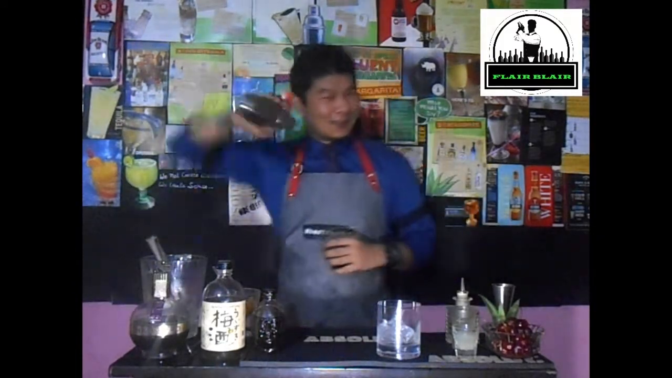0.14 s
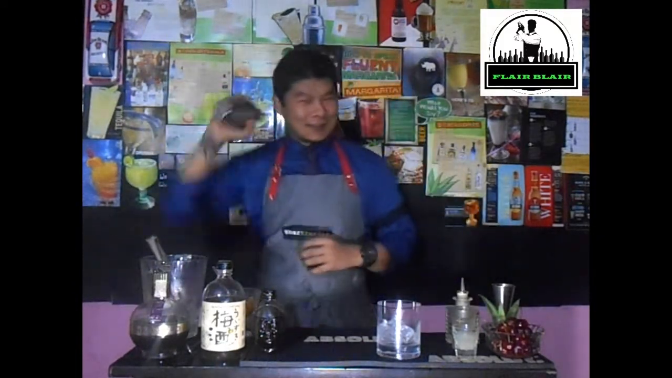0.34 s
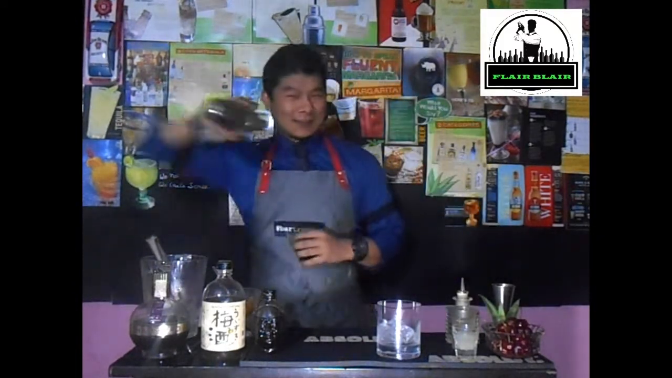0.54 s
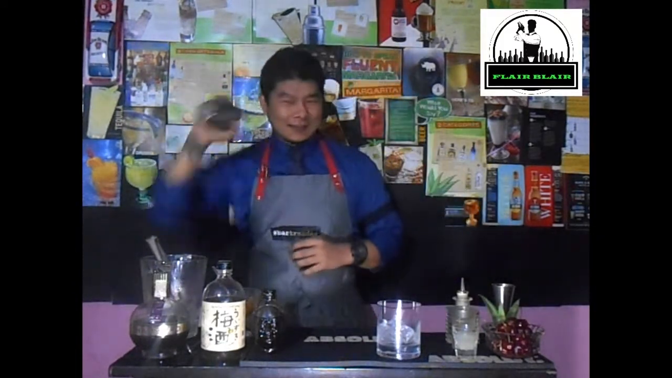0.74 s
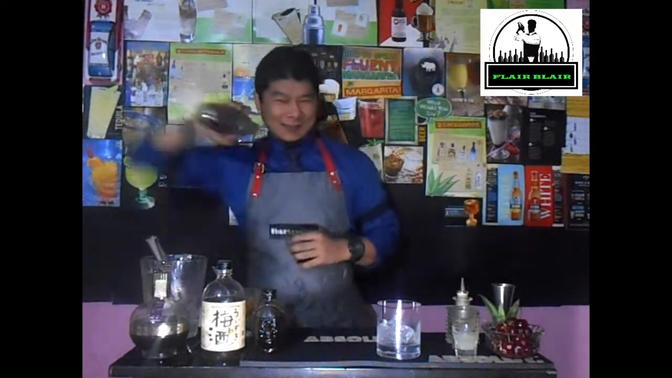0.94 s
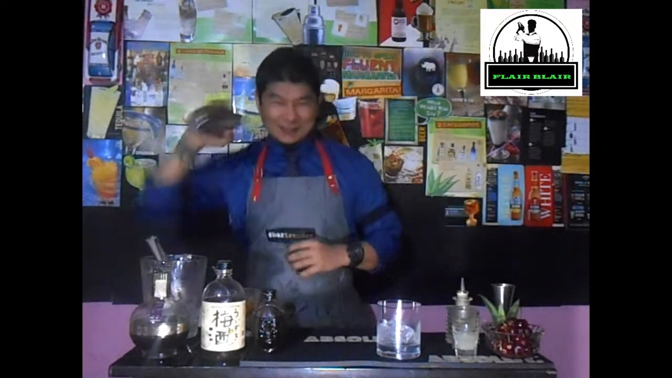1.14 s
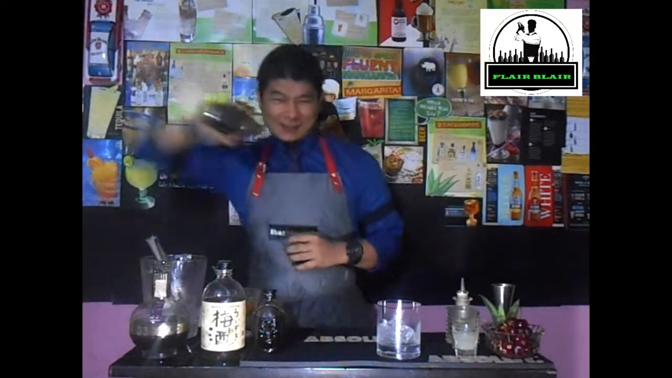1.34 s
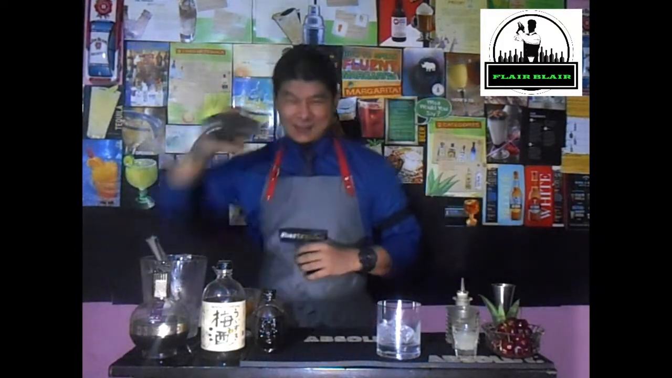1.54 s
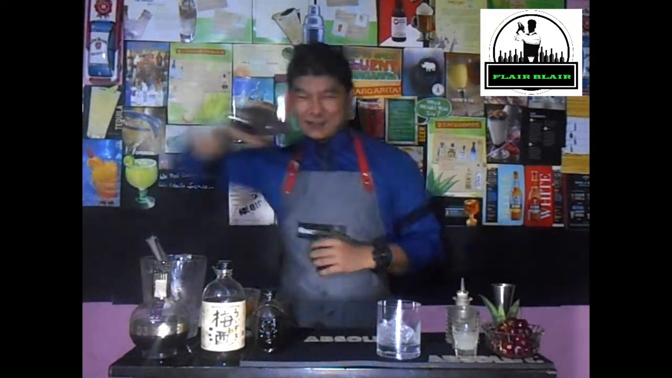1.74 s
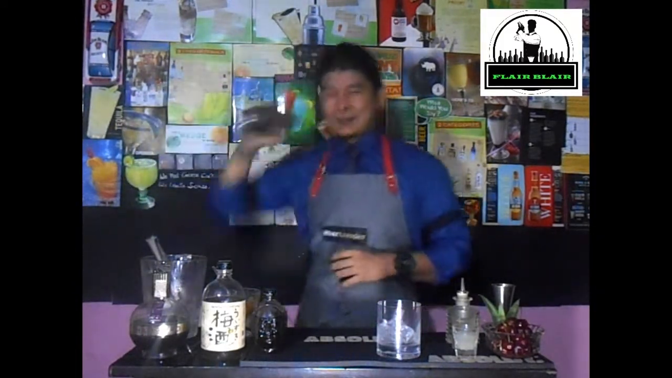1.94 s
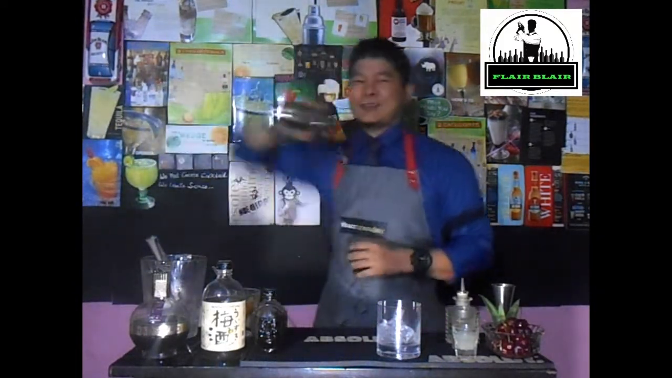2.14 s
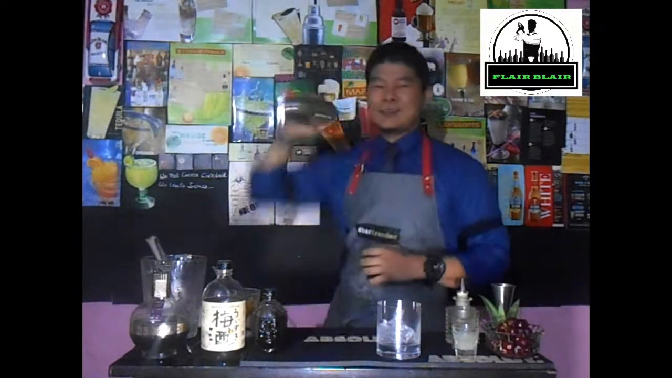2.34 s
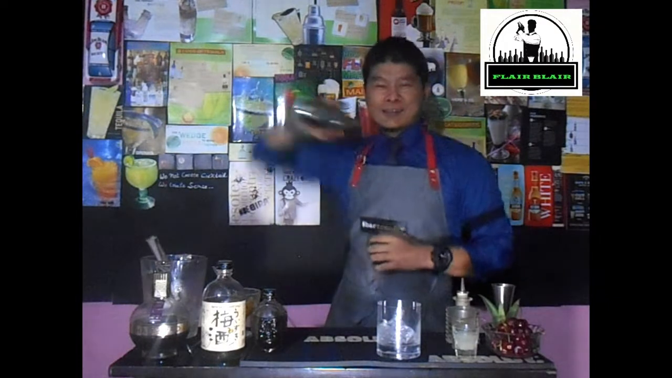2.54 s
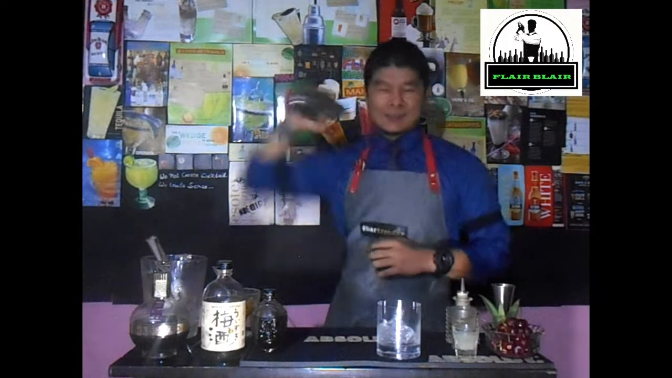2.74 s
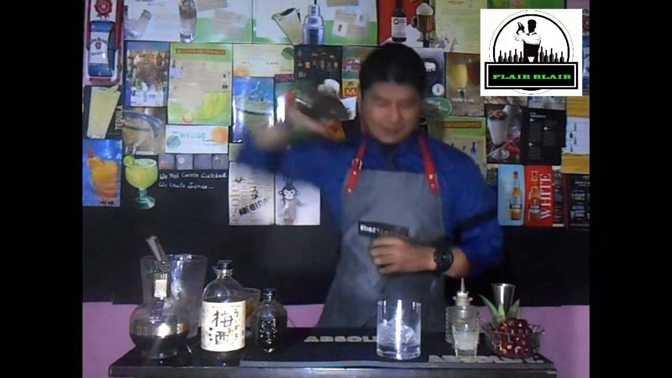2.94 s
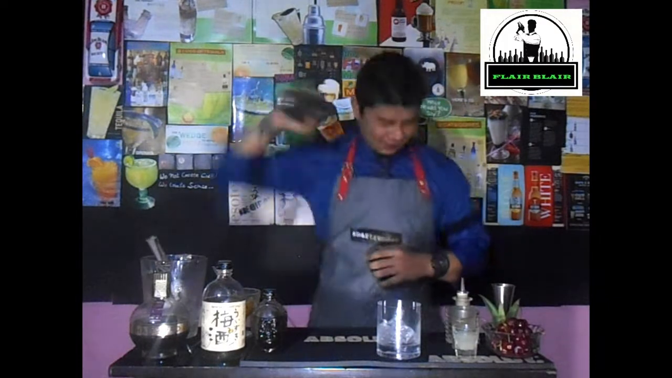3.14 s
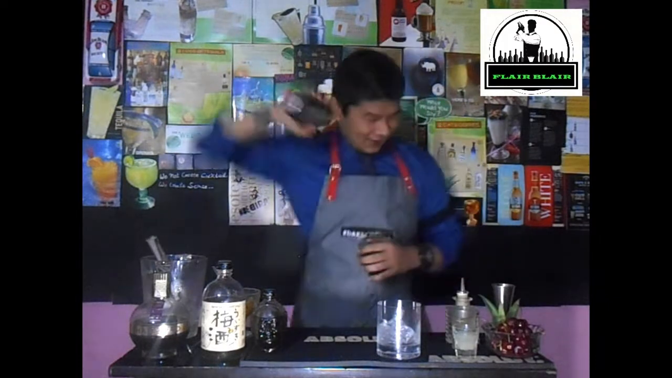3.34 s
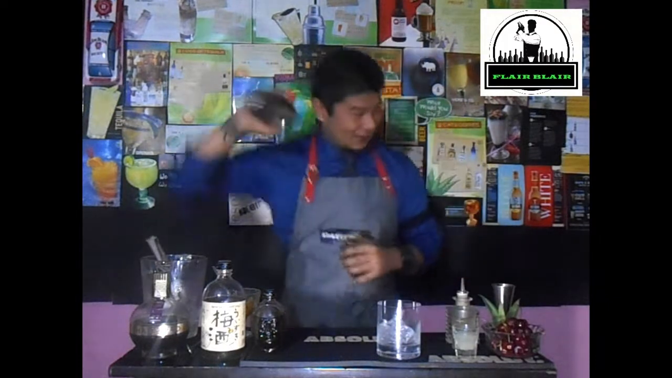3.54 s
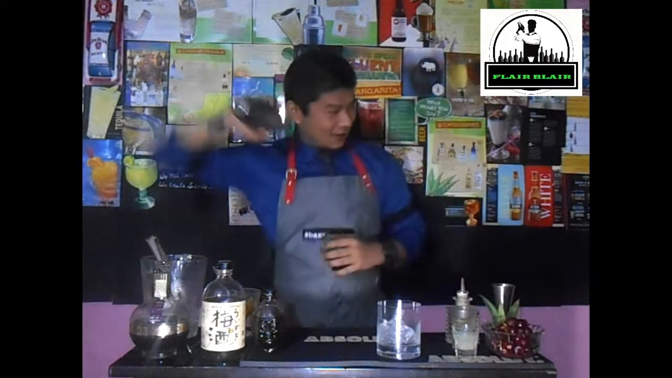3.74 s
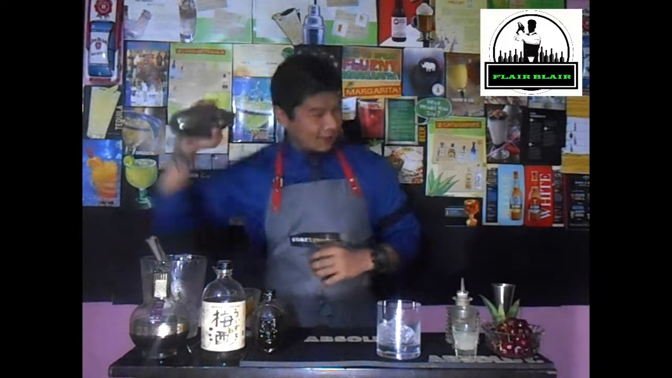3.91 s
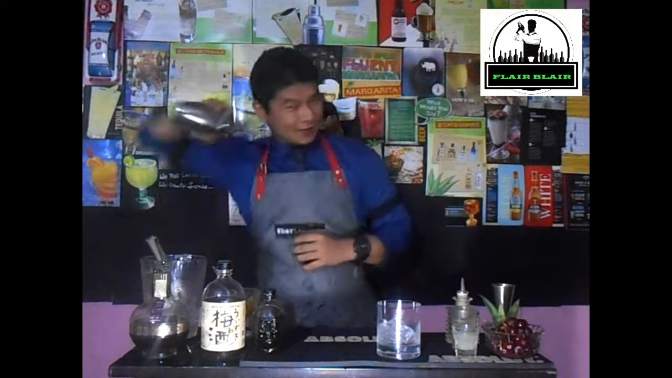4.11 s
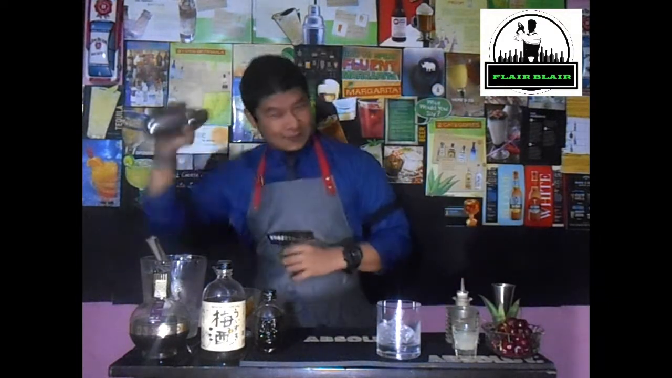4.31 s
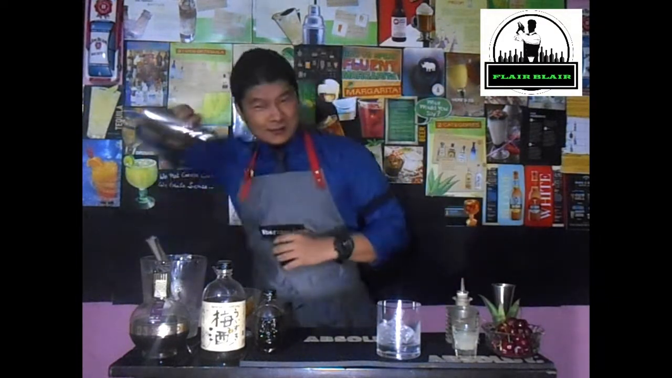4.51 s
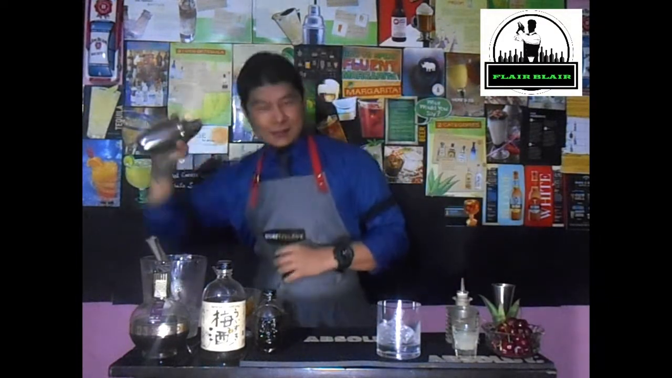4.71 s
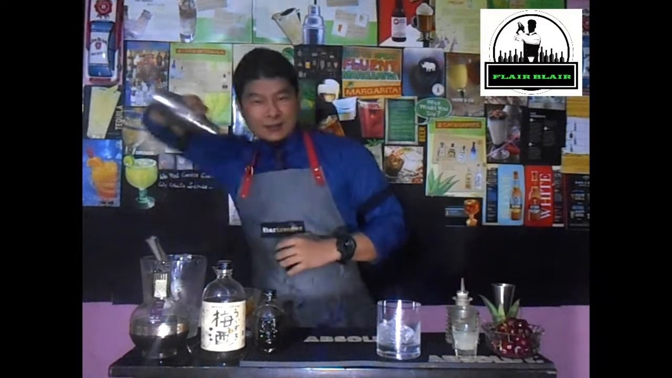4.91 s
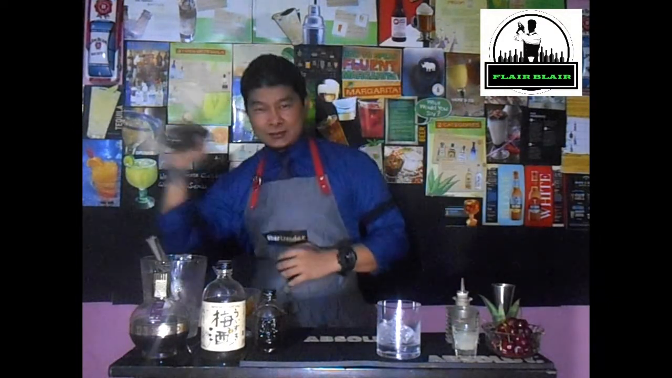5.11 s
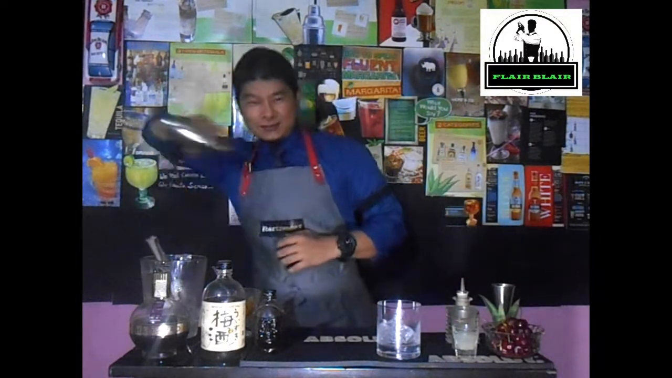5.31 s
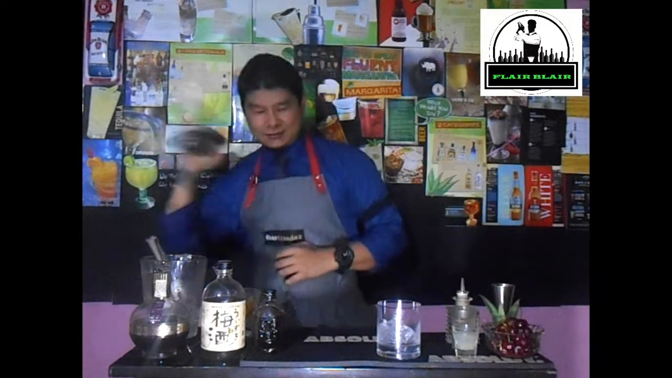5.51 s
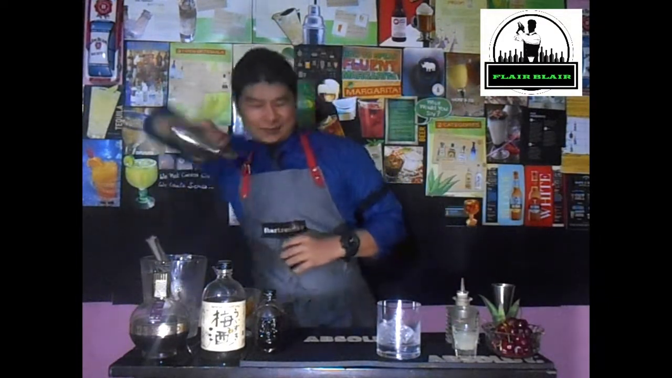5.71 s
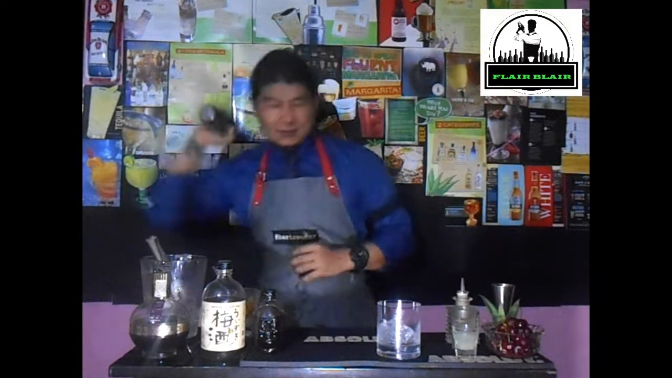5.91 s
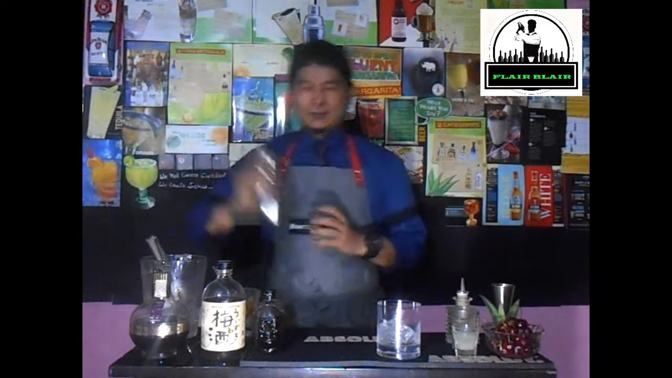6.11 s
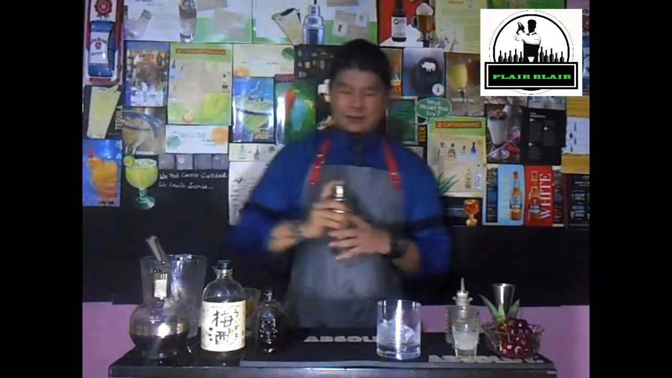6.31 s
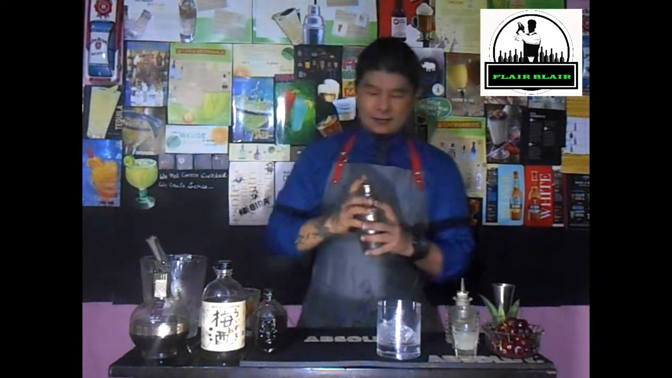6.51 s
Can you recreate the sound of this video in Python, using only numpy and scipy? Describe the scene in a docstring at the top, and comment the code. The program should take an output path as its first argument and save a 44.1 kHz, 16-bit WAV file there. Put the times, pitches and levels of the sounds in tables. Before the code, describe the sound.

Ice cubes rattle hard and fast in a steel cocktail shaker, bright and metallic in a small live room, then stop abruptly.

```python
"""A dense, bright rattle comes first: ice cubes shaken hard in a steel shaker, in a small, live room, until they settle.
About five times a second the load flies to and fro and strikes cap and base in turn, as a swarm of tiny contacts that
excite the modes of the tin; the base rings the wall more. Single cubes and chips knock out of the swarm and the thin
wall sings on. Changing echoes surround it all; low cloth rumble, soft flaps and steady air noise lie underneath."""
import sys
import numpy as np
from scipy import signal
from scipy.fft import rfft, irfft
from scipy.io import wavfile
from scipy.ndimage import uniform_filter1d

SR = 44100
rng = np.random.default_rng(int(sys.argv[2]) if len(sys.argv) > 2 else 0)


def int16_out(signal):
    """Quantize to a 16-bit WAV file."""
    q = np.round(np.clip(np.atleast_2d(signal).T, -1, 1) * 32767)
    wavfile.write(sys.argv[1], SR, q.astype(np.int16))


N = 289296

# The load hits the cap and the base in turn, the cap first; level is relative, as if each crash lasted 50 ms.
# Columns: start_s, spread_s, level_db, brightness_db
CRASHES = [(-0.025, 0.031, -28, -5.5), (0.104, .016, -27, -2), (0.177, 0.013, -28.5, -2.5),
           (0.292, .015, -29, -2.5), (0.36, .022, -31, 4), (0.484, .023, -33, -5), (0.571, 0.025, -32, -10),
           (0.696, .028, -29, -3.5), (0.78, 0.024, -31, -8), (0.895, .02, -27.5, -2.5),
           (0.977, .015, -27, 4), (1.092, .014, -33, -1), (1.182, 0.025, -33, -3.5),
           (1.303, 0.02, -30.5, 0), (1.386, .014, -30.5, -6.5), (1.485, .015, -29, 0.5),
           (1.564, 0.025, -32.5, 8), (1.683, .017, -32, -2), (1.777, .014, -32.5, 0),
           (1.845, 0.074, -33, -3.5), (1.989, 0.016, -30, -1), (2.066, 0.032, -28, 0),
           (2.178, .032, -30, -10.5), (2.312, 0.015, -29.5, -6), (2.37, 0.021, -30, 17),
           (2.479, .014, -29, 1.5), (2.55, .032, -30, 2), (2.681, .021, -32, -2.5),
           (2.781, 0.018, -35.5, -2), (2.87, 0.028, -29.5, -1.5), (2.952, 0.028, -30, -6.5),
           (3.087, 0.017, -32, -5), (3.163, 0.026, -29, -2.5), (3.271, 0.019, -30.5, 2),
           (3.346, 0.082, -26.5, -4), (3.467, .022, -27.5, -4), (3.576, 0.0054, -32.5, 3),
           (3.64, 0.02, -34, 0.5), (3.77, 0.017, -28.5, 3.5), (3.874, 0.034, -28, 2),
           (3.966, 0.0094, -33, 0), (4.078, .019, -34, -4.5), (4.172, 0.017, -33.5, 1),
           (4.286, .025, -28.5, -3), (4.391, 0.012, -31, 5.5), (4.478, 0.022, -29, 0.5),
           (4.575, 0.0089, -26.5, -1), (4.652, 0.06, -27, 2.5), (4.783, .013, -33.5, -3),
           (4.888, 0.028, -30.5, 4.5), (4.992, 0.025, -30.5, -2.5), (5.134, .02, -28, -1),
           (5.22, 0.017, -28.5, 7), (5.3, 0.033, -28.5, 3.5), (5.442, .013, -34, -3),
           (5.545, 0.028, -25.5, 6.5), (5.675, .011, -34, -3), (5.73, 0.047, -30, 5),
           (5.873, .009, -32, 0.5), (6.012, .028, -28, 0.5), (6.148, 0.012, -31, 1),
           (6.33, 0.024, -53.5, -6)]
# How each end colours a crash; rows are cap, then base. Columns: hollow_body_db, wall_ring_db, fine_chips_db
END_COLOURS = [(4.9, -4.5, 1), (2.95, 3, -3.5)]
# Change of body, wall ring and chips with a crash's brightness. Values: slope_db_per_db
BRIGHTENING = [-.3, -.9, 0.35]
# Centres of the body, wall ring, two ice clack and chip ranges. Values: centre_hz
RANGES_HZ = [1300, 2430, 3300, 5000, 7200]
# Resonances of the filled tin, damped by hand and drink; width is that of one of two filter passes.
# Columns: pitch_hz, width_hz, relative_level_db
TIN_MODES = [(536.6, 97, -12), (594, 102, -16.5), (856, 167, -9), (1235, 710, -8.5), (1715, 470, -3.5),
             (2230, 530, 0), (2350, 386, -3), (2450, 920, -3.5), (3200, 1710, 2), (4600, 1680, 0.5),
             (5170, 1600, -41), (6850, 1580, -11), (8280, 420, -20.5)]
# Whole cubes strike hard, and after the last stroke the ice settles; peak is that of the blow before radiation.
# Columns: start_s, peak_db, pitch_hz, width_hz
KNOCKS = [(0.1072, -11, 2230, 990), (0.1323, -10.5, 4600, 2300), (0.296, -11, 2510, 900),
          (0.2997, -7, 2460, 1000), (0.3028, -12, 2270, 770), (0.3225, -18, 2380, 960),
          (0.3849, -12, 3200, 950), (0.5186, -12, 2460, 1310), (0.6892, -13.5, 2520, 1640),
          (0.7265, -9.5, 2300, 700), (0.8805, -12, 2720, 1800), (0.882, -12.5, 4300, 2000),
          (0.9063, -13, 2470, 1460), (0.9116, -9, 2140, 1070), (0.9849, -6, 3870, 1620),
          (0.999, -9.5, 3390, 2140), (1.0066, -7, 4560, 2360), (1.1935, -10.5, 3560, 1410),
          (1.2063, -10.5, 3480, 1150), (1.298, -15.5, 2260, 940), (1.4974, -11, 5550, 1783),
          (1.5736, -14.5, 3180, 1140), (1.5787, -10, 3520, 1540), (1.5944, -12.5, 2860, 910),
          (1.689, -15.5, 2350, 1550), (1.784, -14.5, 3750, 1830), (1.9981, -9.5, 3300, 1300),
          (2.069, -10, 3900, 1760), (2.3295, -6.5, 2430, 550), (2.355, -15.5, 2350, 500),
          (2.3816, -4, 3430, 900), (2.3856, -11, 3330, 770), (2.463, -11.5, 4150, 2070),
          (2.476, -17, 4020, 1920), (2.5893, -8, 3400, 2360), (2.7882, -18, 3510, 760),
          (2.8656, -15, 2540, 1520), (2.9938, -7.5, 3380, 2360), (3.2365, -11.5, 3400, 1500),
          (3.288, -11, 2400, 1410), (3.3194, -11, 3210, 1380), (3.4422, -14.5, 4400, 2120),
          (3.5241, -11.5, 2600, 1040), (3.6517, -12.5, 2380, 2140), (3.683, -15.5, 2310, 599),
          (3.689, -17, 2360, 670), (3.9831, -8, 3460, 674), (4.0815, -17.5, 2430, 600),
          (4.1893, -13.5, 3500, 1440), (4.295, -17, 3530, 1620), (4.4914, -11, 2450, 1328),
          (4.5433, -11.5, 4190, 2130), (4.5831, -12, 3620, 1360), (4.6644, -15, 2860, 1910),
          (5.0138, -10, 3820, 1330), (5.2326, -9.5, 3700, 1360), (5.2501, -10.5, 5370, 1760),
          (5.3093, -10.5, 2430, 1800), (5.6562, -18, 3540, 2380), (5.8004, -11, 4100, 2000),
          (5.9976, -12, 4160, 1310), (6.049, -10.5, 4750, 1580), (6.053, -11.5, 2320, 800),
          (6.1623, -9.5, 5570, 1200), (6.288, -24, 2005, 1435), (6.3428, -20.5, 5370, 1650),
          (6.3777, -25, 3180, 1740), (6.4, -25.5, 3860, 1800), (6.4833, -27, 3560, 2030)]
# Usual pitch of a loose cube on the cap and on the base. Values: pitch_hz
CUBE_HZ = [4000, 3020]
# Usual pitch of a loose chip on the cap and on the base. Values: pitch_hz
CHIP_HZ = [7800, 7250]
# The wall's two purest tones, which sing on after a knock near their pitch. Columns: pitch_hz, width_hz
WALL_TONES = [(2213, 54), (2287, 29)]
# Early echoes from bar top and wall, before a random shift of delay. Columns: delay_s, level_db
ECHOES = [(.0034, -5.5), (.0072, -11.5), (.0164, -26.5), (.0221, -18), (.029, -11)]
# Level contour of the cloth's rumble, before its overall gain. Columns: time_s, level_db
RUMBLE = [(0.0, -77), (0.11, -51), (0.21, -68.5), (0.95, -73), (1.2, -64), (1.95, -78), (2.5, -68),
          (2.63, -52), (3.07, -52.5), (3.17, -71), (3.42, -63.5), (3.7, -52), (3.97, -50.5), (4.55, -56),
          (4.63, -56.5), (5.45, -53), (6.12, -58), (6.5, -74)]
# The cloth flaps hard. Columns: start_s, peak_db
FLAPS = [(0.104, -43), (2.67, -40), (2.743, -39), (3.055, -35), (3.851, -38), (3.991, -34.5), (4.16, -46),
         (4.3, -44), (4.346, -44), (4.397, -41), (4.519, -38), (4.888, -37), (4.926, -39), (5.172, -38),
         (5.429, -37), (5.501, -42), (5.62, -42), (5.845, -39)]
# Spectral shape of the room's still air, relative. Columns: frequency_hz, density_db
AIR_SPECTRUM = [(25, -7), (60, -17), (150, -11), (300, -3), (500, 1), (900, 2.5), (2000, -3), (5000, -6),
                (10000, -30)]

AIR_DB = -51  # overall RMS level of the air
TOP_HZ = 10300  # the microphone's cutoff
SLOSH = 0.018  # typical share by which the sloshing drink detunes the tin from crash to crash


def undb(db):
    """Logarithmic level: decibels become an amplitude gain."""
    return 10 ** (np.asarray(db) / 20)


def unit(x):
    """Energy normalisation: the sum of squares becomes one."""
    return x / np.sqrt(np.sum(x ** 2))


def band(x, lo_hz, hi_hz, order=2):
    """Band limitation by a Butterworth band-pass."""
    return signal.sosfilt(signal.butter(order, [lo_hz, min(hi_hz, .45 * SR)], "band", fs=SR, output="sos"), x)


def ring(hz, width_hz, size=2048):
    """Impulse response of a resonance, filtered twice so that its skirts are steep."""
    b, a = signal.iirpeak(hz, hz / width_hz, fs=SR)
    once = signal.lfilter(b, a, signal.unit_impulse(size))
    return signal.lfilter(b, a, once)


def add(out, s, sound):
    """Superposition: a short sound is summed in at a time, cropped to the scene."""
    i = int(np.floor(s * SR))
    part = sound[max(-i, 0):max(N - i, 0)]
    out[max(i, 0):max(i, 0) + len(part)] += part


def tin_rings(stretch=1):
    """Modal decomposition: one ring for each mode of the tin, together of energy one."""
    rings = [undb(db) * ring(hz * stretch, width, size=1024) for hz, width, db in TIN_MODES]
    return unit(np.array(rings))


def crashes(contacts_per_s=1600, size_db=5, spot=1.0, gain_db=-1.0, count=128):
    """Modal excitation by a swarm of contacts that swells and thins out, each ringing its own mix of modes."""
    out = np.zeros(N)
    mode_hz = np.array(TIN_MODES)[:, 0]
    chance = rng.standard_normal((len(CRASHES), len(TIN_MODES) + 1, count))
    slots = rng.random((len(CRASHES), count))
    stretches = np.exp(SLOSH * rng.standard_normal(len(CRASHES)))
    age = np.linspace(0, 8, 200)  # in units of the crash's spread
    arrived = 1 - (1 + age) * np.exp(-age)  # share of the load that has landed
    for k, (s, spread, db, bright) in enumerate(CRASHES):
        luck = chance[k]
        n = int(np.clip(contacts_per_s * spread, 12, count))
        landed = (np.arange(n) + slots[k, :n]) / n
        at = (SR * spread * np.interp(landed, arrived, age)).astype(int)
        # the spot that is struck decides how strongly each mode answers
        size = undb(size_db * np.minimum(luck[0, :n], 1.2))
        force = size * (1 + spot * luck[1:, :n])
        force /= np.sqrt(np.sum(force ** 2, axis=1, keepdims=True))
        body, wall, chips = np.array(END_COLOURS[k % 2]) + bright * np.array(BRIGHTENING)
        colour = np.interp(np.log(mode_hz), np.log(RANGES_HZ), [body, wall, 0, 0, chips])
        pushes = np.zeros((len(TIN_MODES), at[-1] + 2))
        pushes[:, at] = force * undb(db + gain_db + colour)[:, None]
        modes = signal.fftconvolve(pushes, tin_rings(stretches[k]), axes=1)
        add(out, s, modes.sum(axis=0))
    return out * np.sqrt(SR / 20)  # the energy of 50 ms


def landings(count):
    """Gamma-distributed arrival, in units of spread: few at first, most near one spread, then stragglers."""
    return -np.log(rng.random((len(CRASHES), count, 2))).sum(axis=2)


def strays(end_hz, over_db, scatter_db, scatter, width_hz, count):
    """Random impacts of loose pieces in every crash, louder when it is harder: start_s, peak_db, pitch_hz, width_hz."""
    ages = landings(count)
    chance = rng.standard_normal((len(CRASHES), count, 2)).clip(-1.5, 1.5)
    blows = []
    for k, (s, spread, db, _) in enumerate(CRASHES):
        for age, (force, spot) in zip(ages[k], chance[k]):
            peak_db = db + over_db + scatter_db * force
            pitch_hz = end_hz[k % 2] * np.exp(scatter * spot)
            blows.append((s + spread * age, peak_db, pitch_hz, width_hz))
    return blows


def knocks(crack_db=-13, crack_hz=5400, crack_width_hz=4200, rebound_s=.004, rebound_db=-9, vary=.4,
           spread_s=0.001198):
    """Impact and rebound: a crack and a short clack go ahead, the whole tin rings all around a little later."""
    ahead, around = np.zeros(N), np.zeros(N)
    crack = ring(crack_hz, crack_width_hz)
    crack = undb(crack_db) * crack / np.abs(crack).max()
    rings = tin_rings()
    cubes = strays(CUBE_HZ, over_db=10.5, scatter_db=1.0, scatter=.18, width_hz=930, count=1)
    chips = strays(CHIP_HZ, over_db=6.5, scatter_db=3.0, scatter=0.052, width_hz=3300, count=2)
    blows = cubes + chips + list(KNOCKS)
    chance = rng.standard_normal((len(blows), len(TIN_MODES) + 1))
    for (s, db, hz, width), luck in zip(blows, chance):
        clack = ring(hz, width)
        blow = clack / np.abs(clack).max() + crack
        blow *= undb(db) / np.abs(blow).max()
        add(ahead, s, blow)
        add(ahead, s + rebound_s * np.exp(vary * luck[0]), undb(rebound_db) * blow)
        # the tin's ring carries the energy of the blow, in a random mix of modes
        add(around, s + spread_s, np.linalg.norm(blow) * unit(luck[1:] @ rings))
    return ahead, around


def singing(clacks, sing_db=-3):
    """Sympathetic resonance: the thin wall picks up the knocks and rings on."""
    wall = sum(ring(hz, width, size=4096) for hz, width in WALL_TONES)
    return undb(sing_db) * signal.fftconvolve(clacks, wall)[:N]


def echo_pattern(near_db=-2, near_t60=0.25, far_db=-2, far_t60=0.89, treble_t60=0.42, treble_hz=5500,
                 build_s=0.00055, wander=.15):
    """Reverberation at one spot: a few hard echoes, a quick scatter off bottles and shelves, a longer ring."""
    t = np.arange(SR) / SR
    near, far = rng.standard_normal((2, SR))
    dull = signal.sosfiltfilt(signal.butter(2, treble_hz, fs=SR, output="sos"), far)

    def fade(t60_s):
        """Exponential decay by 60 dB in t60_s, after a brief build-up."""
        return (1 - np.exp(-t / build_s)) * np.exp(-np.log(1000) * t / t60_s)

    response = undb(near_db) * unit(near * fade(near_t60))
    response += undb(far_db) * unit(dull * fade(far_t60) + (far - dull) * fade(treble_t60))
    for (delay, db), shift in zip(ECHOES, rng.standard_normal(len(ECHOES))):
        response[int(delay * np.exp(wander * shift) * SR)] += undb(db)
    return response


def room(x, count=14, size=512):
    """Position-dependent reverberation: the shaker travels many wavelengths per stroke and meets changing echoes."""
    spot = np.repeat(rng.integers(0, count, N // size + 1), size)[:N]  # a new draw every size samples
    out = np.zeros(N)
    for k in range(count):
        share = uniform_filter1d((spot == k).astype(float), size // 4)  # short crossfades
        out += signal.fftconvolve(x * share, echo_pattern())[:N]
    return out


def flutter(over_db=6, scatter_db=3, count=70):
    """Random small flaps whose strength follows the rumble: rows of start_s, peak_db."""
    s = (np.arange(count) + rng.random(count)) / count * N / SR
    force = np.minimum(rng.standard_normal(count), 1)
    return list(zip(s, np.interp(s, *np.transpose(RUMBLE)) + over_db + scatter_db * force))


def cloth(rumble_db=-3, patchy_db=4, flap_db=0, flap_hz=175, flap_width_hz=260, vary=0.24, count=260):
    """Modulated low-band noise for uneven rumble, and damped resonances for flaps: soft pops of a cycle or two."""
    t = np.arange(N) / SR
    s, db = np.transpose(RUMBLE)
    fold_db = patchy_db * np.interp(t, np.linspace(0, t[-1], count), rng.standard_normal(count))
    uneven = undb(fold_db) * rng.standard_normal(N)
    rumble = unit(band(band(uneven, 50, 180, order=1), 25, 420)) * np.sqrt(N)
    out = rumble * undb(np.interp(t, s, db) + rumble_db)
    flaps = flutter() + list(FLAPS)
    for (s, db), luck in zip(flaps, rng.standard_normal(len(flaps))):
        pop = band(ring(flap_hz * np.exp(vary * luck), flap_width_hz), 30, 510)
        add(out, s, undb(db + flap_db) * pop / np.abs(pop).max())
    return out


def air():
    """Stationary noise with a shaped spectrum: the faint, steady sound of the room."""
    hz, db = np.transpose(AIR_SPECTRUM)
    bins = np.maximum(np.fft.rfftfreq(N, 1 / SR), 1)
    shape = undb(np.interp(np.log(bins), np.log(hz), db))
    noise = irfft(rfft(rng.standard_normal(N)) * shape, N)
    return unit(noise) * np.sqrt(N) * undb(AIR_DB)


def scene(swarm_direct_db=0.0, clack_direct_db=-0.1, knock_tin_db=-8, knock_room_db=-9, beam_hz=1100):
    """Directivity and superposition: direct and reverberant sound of the shaker, over cloth and air."""
    clacks, struck_tin = knocks()
    tin = crashes() + undb(knock_tin_db) * struck_tin + singing(clacks)
    # the tin beams its treble and spreads its bass, so the lows arrive mostly by way of the walls
    beam = signal.butter(1, beam_hz, "high", fs=SR, output="sos")
    direct = signal.sosfilt(beam, undb(swarm_direct_db) * tin + undb(clack_direct_db) * clacks)
    # the clacks that stand out are those aimed at the microphone; they feed the room little
    reverberant = room(tin + undb(knock_room_db) * clacks)
    return (direct + reverberant + cloth() + air())[None]


def record(dry, droop_hz=9400):
    """Band limitation in a small microphone, which droops in the top octave and then cuts off."""
    soft = signal.sosfilt(signal.butter(8, droop_hz, fs=SR, output="sos"), dry)
    return signal.sosfilt(signal.ellip(8, .2, 70, TOP_HZ, fs=SR, output="sos"), soft)


dry = scene()
out = record(dry)
int16_out(out)
```